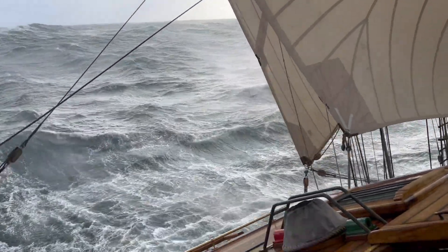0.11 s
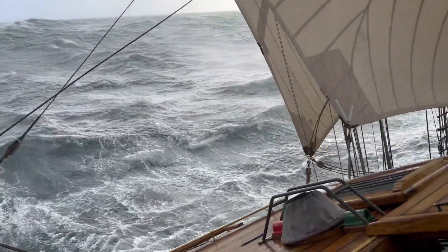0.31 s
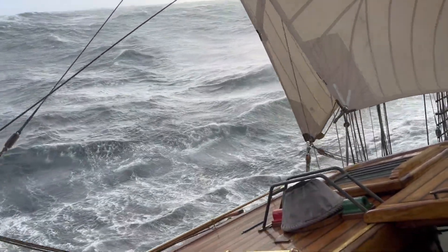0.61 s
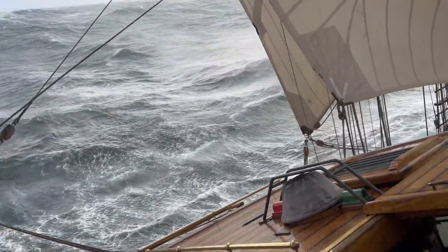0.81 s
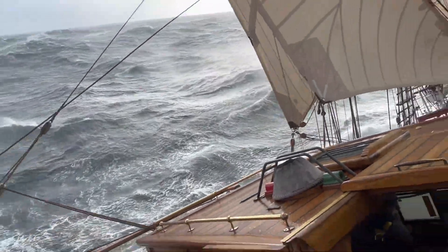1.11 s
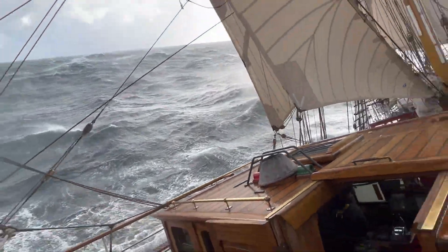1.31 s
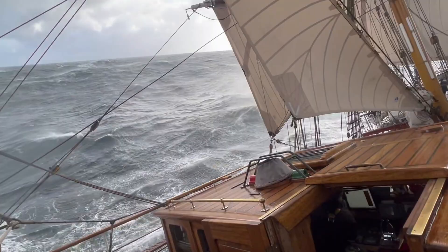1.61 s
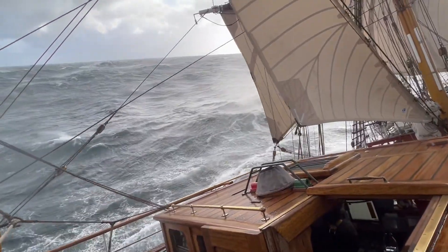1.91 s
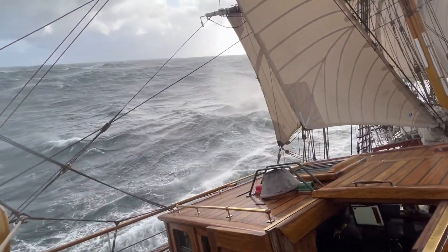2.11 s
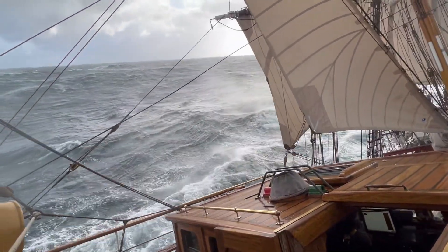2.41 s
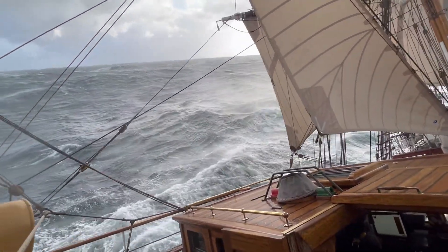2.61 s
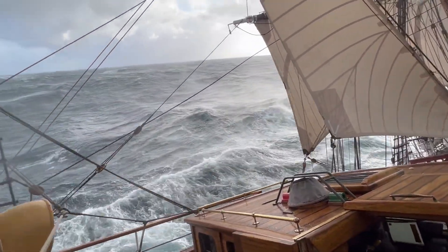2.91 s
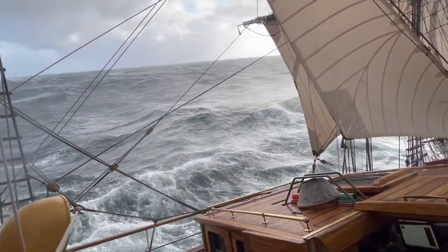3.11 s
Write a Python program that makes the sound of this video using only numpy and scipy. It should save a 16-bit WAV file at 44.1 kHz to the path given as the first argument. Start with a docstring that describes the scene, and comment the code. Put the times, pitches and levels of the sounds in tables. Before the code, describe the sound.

Strong gale wind buffets a microphone on a sailing ship's open deck. Short, uneven thumps with ragged, raspy blasts start at 0.2 s, scattered at first. Hard knocks and snaps cluster around 1.07-1.23 s; gusts then crowd together, with the sharpest blow at 1.75 s. Thin hiss and spits follow to 2.2 s, a brief lull, then heavy thuds at 2.5-3.0 s, easing into low rumble and faint sea rush.

```python
"""Quick, uneven gusts buffet a microphone on the open deck of a sailing ship in a gale.
Each eddy is shaped noise: a ragged blast and a rasp, then a low thump; short noise bursts make sharp snaps.
The hardest eddies add knocks, made from wobbling sine waves that die away.
Behind them the wind rumbles and the sea rushes, both as filtered noise.
Narrow bands of noise hiss, and thin bursts spit, as air skims the edges of the two microphone ports."""
import sys
import numpy as np
from scipy import signal
from scipy.fft import rfft, irfft, next_fast_len
from scipy.io import wavfile
from scipy.ndimage import uniform_filter1d, minimum_filter1d

SR = 44100
rng = np.random.default_rng(int(sys.argv[2]) if len(sys.argv) > 2 else 0)


def persist_wave(psi):
    """Save psi, clipped to +-1, as 16-bit WAV."""
    counts = np.round(np.clip(psi, -1, 1) * 32767).astype(np.int16)
    wavfile.write(sys.argv[1], SR, np.atleast_2d(counts).T)


N = 143325  # length in samples
PORTS_SPLIT_HZ = 1086  # well below this, the two ports hear the same
SWELL_SHAPE = 1.85  # 1 is a spike, 2 a round swell
CRACKS_PER_S = 390  # average, at random moments


def undb(db):
    """Turn decibels into gain."""
    return 10 ** (np.asarray(db) / 20)


def curve(table, column):
    """Join one column of a table by straight lines in time."""
    table = np.array(table)
    return np.interp(np.arange(N) / SR, table[:, 0], table[:, column])


def colour(x, points):
    """Filter by a (Hz, dB) outline without ringing ahead of the sound; average power becomes 1."""
    hz, db = np.array(points).T
    size = next_fast_len(N + 8192)
    f = np.maximum(np.abs(np.fft.fftfreq(size, 1 / SR)), 1)
    outline_db = np.interp(np.log(f), np.log(hz), db)
    # beyond the outline: 24 dB per octave less above it, 12 dB per octave less below it
    outline_db -= 24 * np.maximum(np.log2(f / hz[-1]), 0)
    outline_db -= 12 * np.maximum(np.log2(hz[0] / f), 0)
    # folding the cepstrum makes the filter act only after its input (minimum phase)
    cepstrum = np.fft.ifft(np.log(undb(outline_db))).real
    cepstrum[1:size // 2] *= 2
    cepstrum[size // 2 + 1:] = 0
    response = np.exp(rfft(cepstrum, size))
    y = irfft(rfft(x, size) * response, size)[..., :N]
    return y / np.sqrt(np.mean(y ** 2))


def band(x, hz, width_hz):
    """Keep a band around a centre, at half gain one width away; scaled to a spread of 1."""
    f = np.fft.rfftfreq(N, 1 / SR)
    y = irfft(rfft(x) / (1 + np.abs((f - hz) / width_hz) ** 4), N)
    return y / y.std()


def walk(rate_hz):
    """Wander smoothly at random, with a spread of 1; a higher rate wanders faster."""
    f = np.fft.rfftfreq(N, 1 / SR)
    y = irfft(rfft(rng.standard_normal(N)) * np.exp(-(f / rate_hz) ** 2), N)
    return y / y.std()


def even(x, span_s):
    """Hold the power steady over the span and keep the finer grain."""
    k = max(int(span_s * SR), 2)
    power = uniform_filter1d(uniform_filter1d(np.mean(x ** 2, axis=0), k), k)
    return x / np.sqrt(power + 1e-9)


def noise():
    """Make two unrelated white noises."""
    return rng.standard_normal((2, N))


def ports(pair, likeness, turn=0.):
    """Mix two signals to left and right: one in the bass, partly alike and turned (radians) above."""
    f = np.fft.rfftfreq(N, 1 / SR)
    apart = 1 - 1 / (1 + (f / PORTS_SPLIT_HZ) ** 10)
    alike = 1 - apart * (1 - np.clip(likeness, 0, 1))
    mid, side = rfft(pair) * np.sqrt([1 + alike, 1 - alike])
    lead = np.exp(.5j * turn * apart ** 10)
    return irfft(np.array([(mid + side) * lead, (mid - side) / lead]), N)


def turbulence(flutter, rough_db, crack_db):
    """Make noise whose level flutters, with sharp pressure cracks in it."""
    cracks = (rng.random(N) < CRACKS_PER_S / SR) * noise()
    cracks = cracks * np.sqrt(SR / CRACKS_PER_S)  # same average power as the noise
    return (noise() + undb(crack_db) * cracks) * undb(rough_db * flutter)


def swells(times, rises, falls, db):
    """Join overlapping swells in power, each rising to its peak and falling away (1 ms at the least)."""
    from_peak = np.arange(N) / SR - times[:, None]
    width = np.maximum(np.where(from_peak < 0, rises[:, None], falls[:, None]), 1e-3)
    shape = np.exp(-2 * np.minimum(np.abs(from_peak) / width, 10) ** SWELL_SHAPE)
    return np.sqrt(undb(2 * db) @ shape)


# steady wind, sea and edge sizzle: (time [s], rumble level [dB], rush level [dB], sizzle level [dB])
STEADY_AIR = [(0, -31.5, -36, -85), (1.0, -35, -38, -96), (1.45, -33.5, -33.5, -58.5),
              (1.75, -26.5, -35.5, -60.5), (2.3, -32.5, -40, -64), (3.05, -35.5, -44, -67.5),
              (3.25, -30, -38.5, -71)]
# tone colour of the low wind: (frequency [Hz], relative level [dB])
RUMBLE_COLOUR = [(20, -37.5), (32, -9.5), (48, -7), (65, -2.5), (110, -5.5), (170, -10), (260, -17.5),
                 (450, -31.5), (900, -71.5)]
# tone colour of wind and waves: (frequency [Hz], relative level [dB])
RUSH_COLOUR = [(120, -13.5), (280, 1), (450, 0), (900, -4.5), (1250, -8), (1700, -12.5), (2800, -10),
               (3600, -23.5), (4700, -30), (6000, -31), (7500, -49), (10000, -65.5)]


def wind_and_sea():
    """Wind presses unsteadily on the microphone as a low rumble; wind and waves make a grainy rush."""
    rumble = even(colour(ports(noise(), likeness=0.98), RUMBLE_COLOUR), span_s=0.14)
    rumble_db = curve(STEADY_AIR, column=1) + 2.2 * walk(26)
    air = ports(turbulence(walk(150), rough_db=2.5, crack_db=-8), likeness=0.62, turn=3.08)
    rush = colour(air, RUSH_COLOUR)
    rush_db = curve(STEADY_AIR, column=2) + 1.7 * walk(46)
    return rumble * undb(rumble_db) + rush * undb(rush_db)


# streaks of hiss: (time [s], rise and fall [s], centre [Hz], level before flutter [dB])
HISS_STREAKS = [(0.384, 0.025, 4240, -50.5), (0.582, 0.016, 3870, -43), (1.072, 0.0033, 3970, -32),
                (1.14, 0.064, 4550, -49), (1.484, 0.072, 4920, -41.5), (1.669, 0.03, 5000, -41.5),
                (1.737, 0.015, 5000, -42), (2.54, 0.034, 5000, -49.5), (2.75, 0.019, 4800, -46)]
HISS_WIDTH = 0.3  # share of the centre frequency


def port_hiss():
    """Air skims the edges of the ports and makes fluttering streaks in narrow bands of noise."""
    air = ports(noise(), likeness=0.65, turn=2.17)
    hiss = 0
    for time, length, hz, db in HISS_STREAKS:
        time, length, db = np.array([[time], [length], [db]])
        hiss = hiss + band(air, hz, HISS_WIDTH * hz) * swells(time, length, length, db)
    return hiss * undb(5.44 * walk(190))


# thin spits of air: (time [s], length scale [s], sizzle level before flutter [dB])
AIR_SPITS = [(1.409, 0.0014, -37.5), (1.724, 0.02, -45), (1.789, 0.0053, -41), (1.923, 0.0087, -39),
             (1.965, 0.035, -49), (2, 0.0023, -37), (2.032, 0.002, -40.5), (2.128, 0.0025, -43),
             (2.153, 0.0069, -37), (2.182, 0.0014, -37.5), (2.258, 0.0067, -48), (2.62, 0.0081, -44.5),
             (2.852, 0.018, -47.5), (2.933, 0.013, -44), (2.963, 0.002, -39.5)]
# tone colour of the thin treble: (frequency [Hz], relative level [dB])
SIZZLE_COLOUR = [(4000, -31), (6000, -4), (7700, -25.5), (8000, 10), (8500, 3), (9300, -1.5), (10200, -9.5),
                 (11000, -27.5)]
# tone colour of scrapes, and of the rasp in snaps and buffets: (frequency [Hz], relative level [dB])
RASP_COLOUR = [(700, -13), (1300, 6.5), (1600, 2.5), (2200, 1.5), (2800, 2), (3400, -9.5), (4300, -18),
               (6000, -36.5), (7500, -41), (10000, -54.5)]
SCRAPE_DB = 6  # body of a spit, above its sizzle


def port_spits():
    """Short spits of air scrape and sizzle at the port edges, over a faint steady sizzle."""
    times, length, db = np.array(AIR_SPITS).T
    spit_level = swells(times, 0.57 * length, 0.67 * length, db)
    steady_level = undb(curve(STEADY_AIR, column=3) + 4.7 * walk(80))
    sizzle = colour(ports(noise(), likeness=0.6), SIZZLE_COLOUR)
    sizzle = sizzle * np.hypot(spit_level, steady_level) * undb(2 * walk(300))
    scrape = colour(ports(noise(), likeness=0.91, turn=np.pi), RASP_COLOUR)
    scrape = scrape * swells(times, 0.53 * length, 1.4 * length, db + SCRAPE_DB) * undb(1.3 * walk(300))
    return scrape + sizzle * undb([[-1.1], [1.1]])  # sizzle is a little louder on the right


# hard knocks within the eddies: (time [s], average pitch [Hz], level [dB], fall [cycles])
HARD_KNOCKS = [(.585, 720, -18, 4), (.708, 2050, -20, 5), (1.072, 390, -9, 2.5), (1.075, 215, -6.5, 2.2),
               (1.092, 620, -12, 2.5), (1.122, 2750, -17, 4), (1.745, 1020, -7.5, 3.5),
               (1.747, 2700, -9, 3.5), (1.965, 1120, -12, 4), (2.756, 300, -14, 3)]
KNOCK_RISE_CYCLES, KNOCK_WOBBLE = .8, .11  # wobble as a share of the pitch


def knocks():
    """The hardest eddies shake the air in a port for a few uneven cycles."""
    t, out = np.arange(N) / SR, 0
    for time, hz, db, fall_cycles in HARD_KNOCKS:
        wobbling_hz = hz * (1 + KNOCK_WOBBLE * walk(0.2183 * hz))
        phase = 2 * np.pi * np.cumsum(wobbling_hz) / SR + rng.uniform(0, 2 * np.pi)
        # high knocks are a quarter cycle apart left to right
        port_shift = np.array([[0], [np.pi / 2]]) * (hz > PORTS_SPLIT_HZ)
        shake = np.sqrt(2) * np.sin(phase + port_shift)
        age = (t - time) * hz  # in cycles
        envelope = np.exp(-np.where(age < 0, -age / KNOCK_RISE_CYCLES, age / fall_cycles))
        out = out + undb(db) * envelope * shake
    return out


# sharp snaps of pressure: (time [s], blast level [dB], rasp level [dB])
PRESSURE_SNAPS = [(0.198, -23, -32), (0.3714, -17, -14.5), (0.65, -16.5, -27), (0.7052, -21, -24),
                  (0.716, -41, -28), (0.822, -19, -25.5), (0.853, -27, -13), (0.886, -22.5, -36),
                  (0.9497, -20.5, -20.5), (1.0706, -15, -11), (1.0962, -24, -15.5), (1.1208, -14.5, -17.5),
                  (1.233, -10, -22), (1.411, -20, -22.5), (1.5376, -17.5, -19.5), (1.6457, -33, -23),
                  (1.6641, -22, -19), (1.677, -18, -24), (1.6968, -28, -22.5), (1.7341, -18, -11.5),
                  (1.74, -11, -27), (1.749, -22, -33), (1.9786, -37, -21), (2.179, -18, -16.5),
                  (2.2, -40, -26), (2.5145, -11, -13.5), (2.54, -13, -19.5), (2.752, -24, -28),
                  (2.761, -14.5, -17.5), (2.8459, -38, -22), (2.8572, -24, -21.5), (2.899, -15.5, -26),
                  (2.9639, -12.5, -17.5), (2.9736, -30, -24)]
# tone colour of the blast in snaps and buffets: (frequency [Hz], relative level [dB])
BLAST_COLOUR = [(100, -35), (230, 1), (340, 1), (480, -1.5), (800, -1), (1080, -4), (1400, -23.5),
                (2200, -59), (5000, -82.5)]
SNAP_RISE_S, SNAP_FALL_S = 0.001, 0.0027


def snaps():
    """Where an eddy breaks off a port, the pressure snaps for a few milliseconds in blast and rasp."""
    times, blast_db, rasp_db = np.array(PRESSURE_SNAPS).T
    rise, fall = np.full(len(times), SNAP_RISE_S), np.full(len(times), SNAP_FALL_S)
    blast = even(colour(ports(noise(), likeness=0.94), BLAST_COLOUR), span_s=0.0023)
    rasp = even(colour(ports(noise(), likeness=0.27, turn=2.72), RASP_COLOUR), span_s=.002)
    return blast * swells(times, rise, fall, blast_db) + rasp * swells(times, rise, fall, rasp_db)


# eddies: (time [s], rise [s], fall [s], thump level [dB], blast level [dB], rasp level [dB])
# rise and fall are those of the blast and rasp
EDDIES = [(0.203, 0.0068, 0.019, -15.5, -20.5, -27.5), (0.237, 0.0045, 0.0062, -25.5, -25.5, -29.5),
          (0.339, 0.019, 0.03, -24.5, -31, -43), (0.372, 0.0053, 0.02, -19, -17, -23.5),
          (0.414, 0.0064, 0.0097, -20, -18.5, -25.5), (0.457, 0.011, 0.047, -27.5, -30, -45),
          (0.583, 0.015, 0.01, -17.5, -16.5, -28.5), (0.696, 0.018, 0.014, -24, -24, -40.5),
          (0.849, 0.017, 0.013, -17.5, -18.5, -26.5), (0.954, 0.0021, 0.0065, -21.5, -43, -45),
          (1.072, 0.012, 0.0097, -21, -16, -21.5), (1.093, 0.011, 0.013, -20, -17, -20.5),
          (1.118, 0.006, 0.02, -22.5, -22, -29), (1.163, 0.016, 0.0092, -28.5, -25, -30),
          (1.203, 0.017, 0.029, -19, -23, -24.5), (1.228, 0.003, 0.008, -21.5, -17, -23),
          (1.373, 0.0044, 0.0071, -25, -20, -21.5), (1.414, 0.012, 0.015, -26, -22, -28.5),
          (1.447, 0.021, 0.035, -19, -23.5, -28.5), (1.519, 0.016, 0.024, -20, -19.5, -24.5),
          (1.565, 0.0071, 0.018, -20.5, -29, -49), (1.602, 0.014, 0.012, -16.5, -27, -32.5),
          (1.677, 0.023, 0.018, -17.5, -19.5, -24), (1.747, 0.015, 0.0071, -14.5, -13, -12.5),
          (1.864, 0.0094, 0.028, -24.5, -26.5, -34), (1.915, 0.0098, 0.014, -19.5, -29, -38.5),
          (1.966, 0.011, 0.01, -37, -20, -26), (2.047, 0.015, 0.006, -19.5, -30.5, -48),
          (2.185, 0.0098, 0.028, -20, -21.5, -23.5), (2.416, 0.029, 0.017, -27, -30.5, -37),
          (2.52, 0.016, 0.0056, -19, -16.5, -23), (2.538, 0.0097, 0.02, -17.5, -15.5, -22.5),
          (2.632, 0.0046, 0.025, -19.5, -21.5, -28), (2.679, 0.017, 0.026, -16, -24.5, -26.5),
          (2.755, 0.014, 0.021, -15.5, -18, -22.5), (2.848, 0.028, 0.023, -20.5, -22, -31),
          (2.968, 0.0097, 0.01, -22, -18.5, -26)]
# tone colour of the low thump: (frequency [Hz], relative level [dB])
THUMP_COLOUR = [(20, -32.5), (35, -23), (60, -0.5), (110, 1), (170, -4), (240, -10), (340, -16.5),
                (700, -64)]
THUMP_DELAY_S = 0.0065
THUMP_RISE_S, THUMP_FALL_S = 0.011, 0.0055  # added to the eddy's own rise and fall
RASP_TILT_HZ, RASP_TILT_DB = 2170, 2  # the rasp leans at random above and below this pitch


def buffets():
    """Eddies hit the ports: a ragged blast and a rasp of shifting colour, then a slower thump."""
    times, rise, fall, thump_db, blast_db, rasp_db = np.array(EDDIES).T
    flutter = walk(260)

    blast = ports(turbulence(flutter, rough_db=4.0, crack_db=3.5), likeness=0.95)
    blast = even(colour(blast, BLAST_COLOUR), span_s=0.02)

    rasp_flutter = 0.6 * flutter + .5 * walk(92)  # partly follows the blast
    rasp = ports(turbulence(rasp_flutter, rough_db=6.5, crack_db=2), likeness=0.11, turn=1.82)
    rasp = colour(rasp, RASP_COLOUR)
    lower = signal.sosfiltfilt(signal.butter(4, RASP_TILT_HZ, fs=SR, output="sos"), rasp)
    upper = rasp - lower
    lean = undb(RASP_TILT_DB * walk(39))
    rasp = even(lower * lean + upper / lean, span_s=0.022)

    thump = even(colour(ports(noise(), likeness=0.87), THUMP_COLOUR), span_s=0.034)
    thump_level = swells(times + THUMP_DELAY_S, rise + THUMP_RISE_S, fall + THUMP_FALL_S, thump_db)
    return (blast * swells(times, rise, fall, blast_db)
            + rasp * swells(times, rise, fall, rasp_db)
            + thump * thump_level)


def scene():
    """Lay the buffets, with their snaps and knocks, over the steady gale."""
    return wind_and_sea() + port_hiss() + port_spits() + knocks() + snaps() + buffets()


CEILING, TOP_HZ = .9, 10800  # highest peak let through by the limiter, and where the treble is cut


def record(dry):
    """Hold down the highest peaks with a quick limiter, then cut the top."""
    size = 133  # samples, about 3 ms
    gain = CEILING / np.maximum(np.abs(dry).max(axis=0), CEILING)
    gain = minimum_filter1d(gain, 2 * size)
    gain = uniform_filter1d(uniform_filter1d(gain, size), size)  # smooth the dips
    top_cut = signal.ellip(8, .2, 70, TOP_HZ, fs=SR, output="sos")
    return signal.sosfilt(top_cut, dry * gain)


dry = scene()
out = record(dry)
persist_wave(out)
```